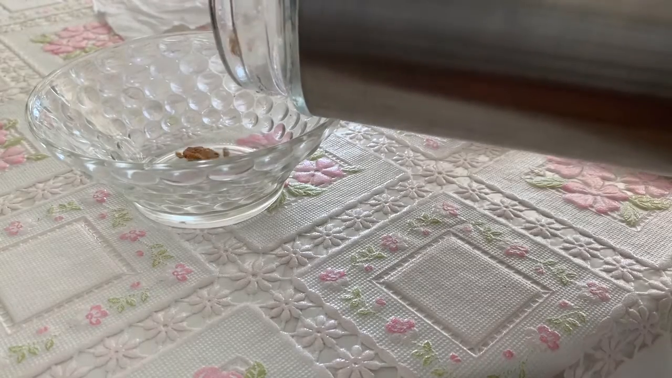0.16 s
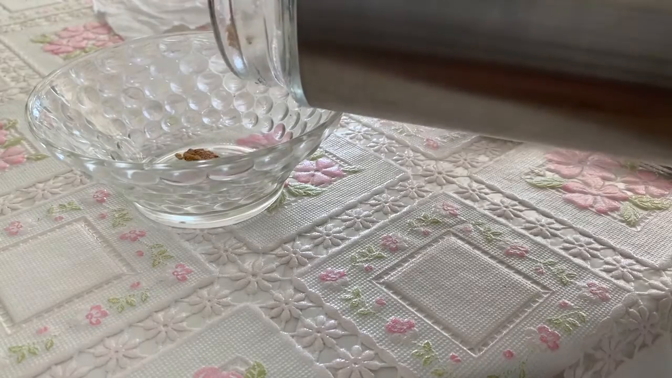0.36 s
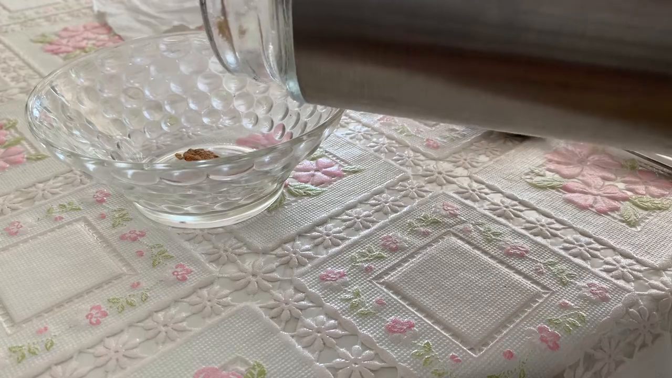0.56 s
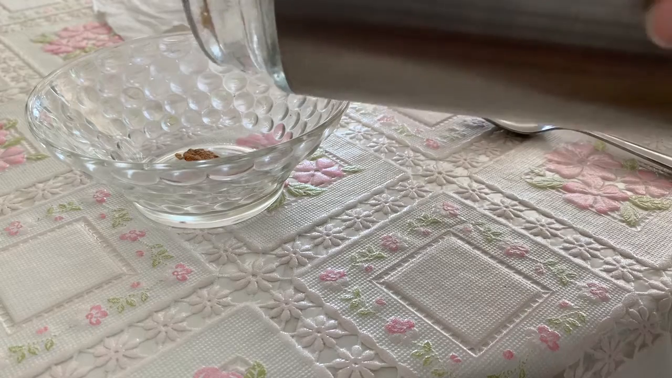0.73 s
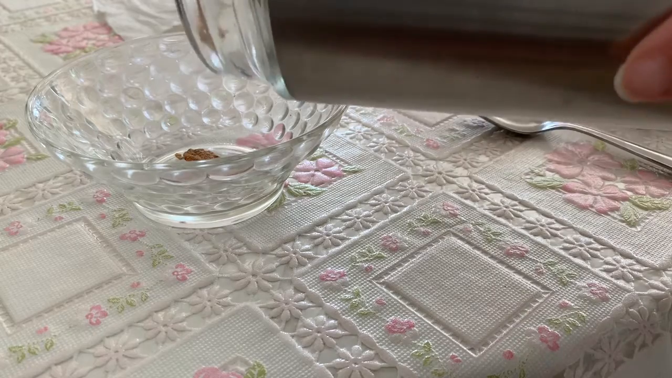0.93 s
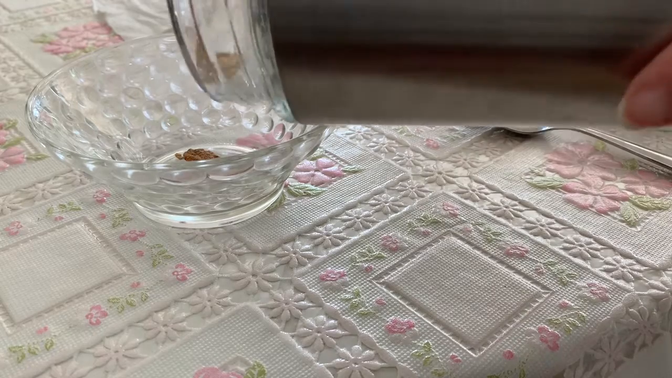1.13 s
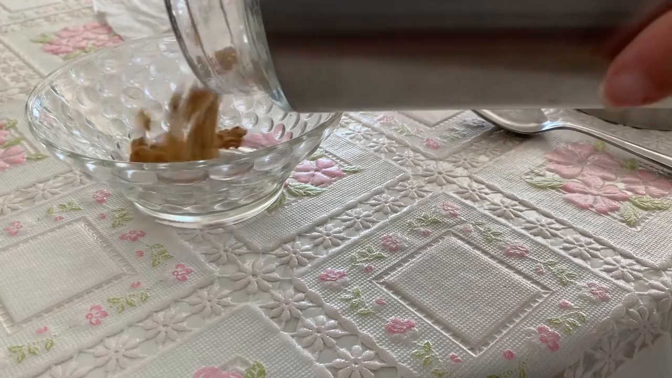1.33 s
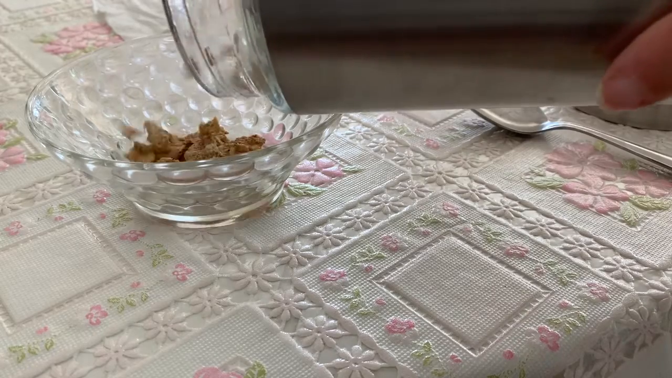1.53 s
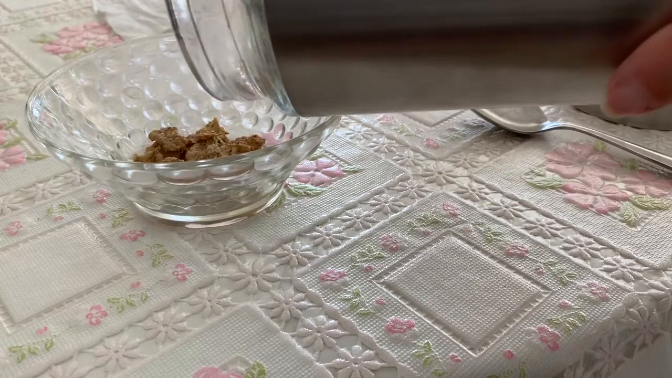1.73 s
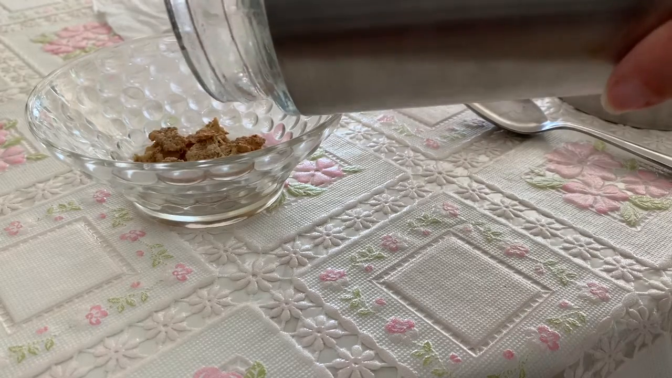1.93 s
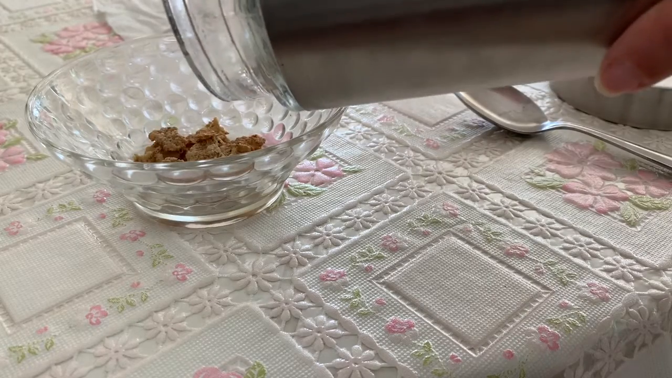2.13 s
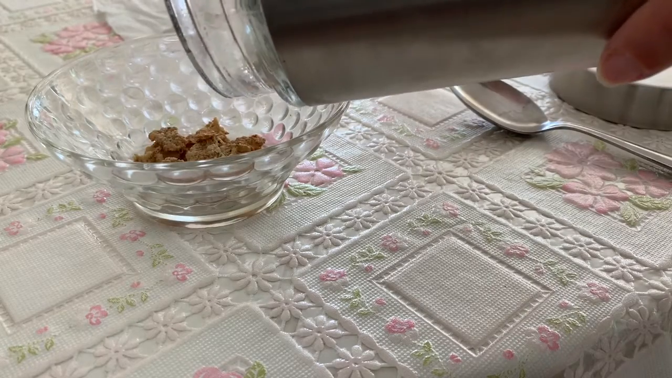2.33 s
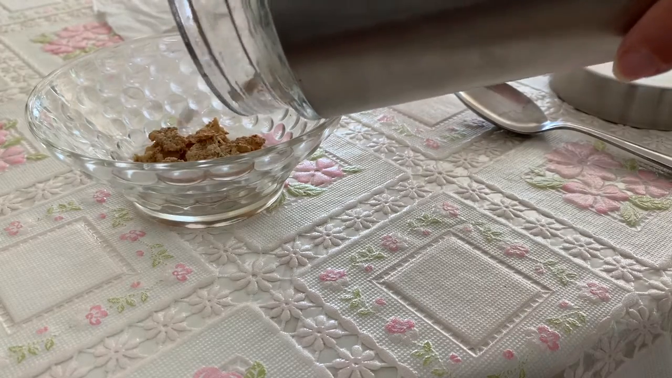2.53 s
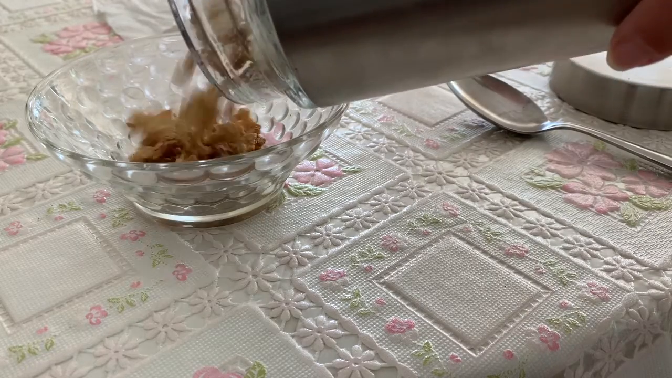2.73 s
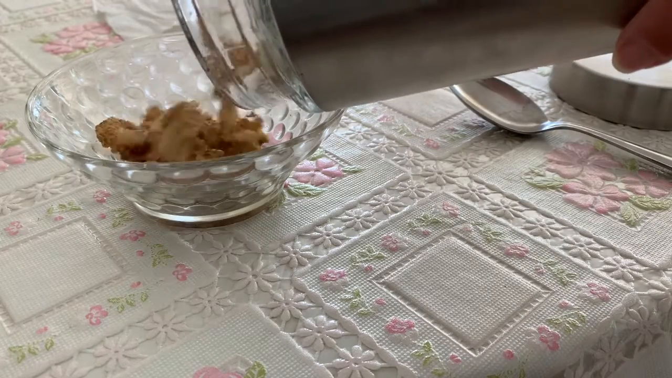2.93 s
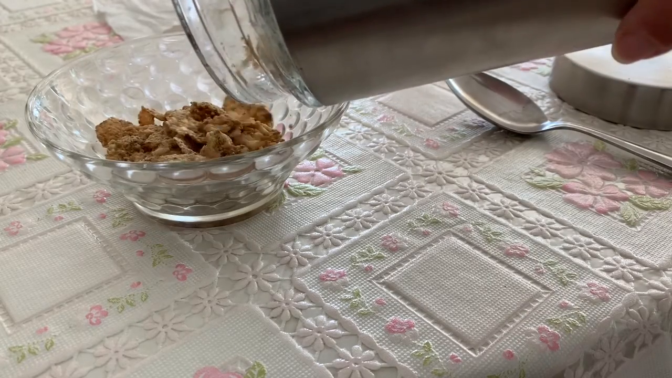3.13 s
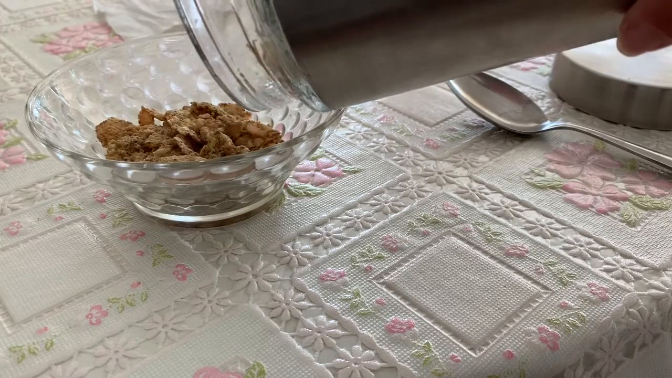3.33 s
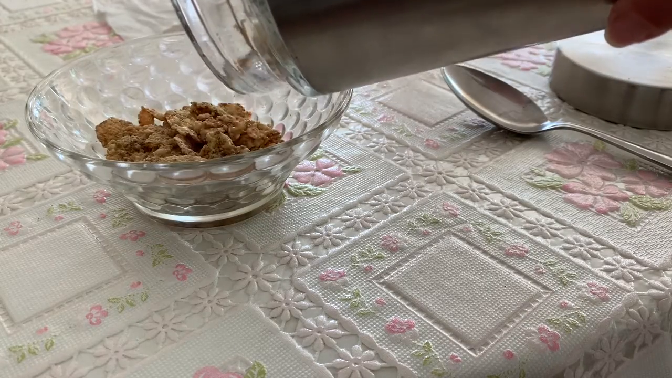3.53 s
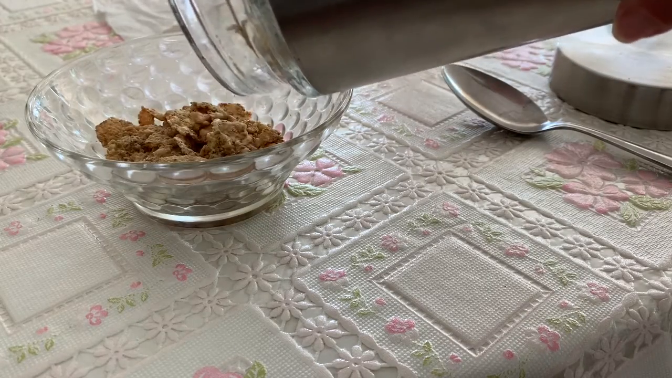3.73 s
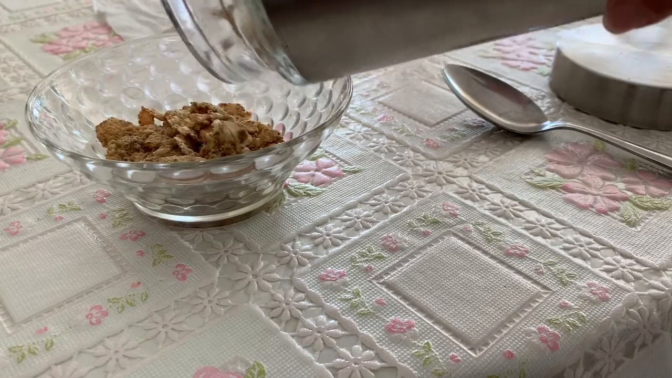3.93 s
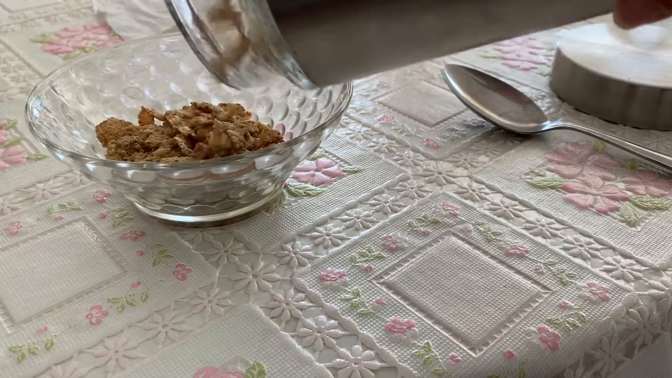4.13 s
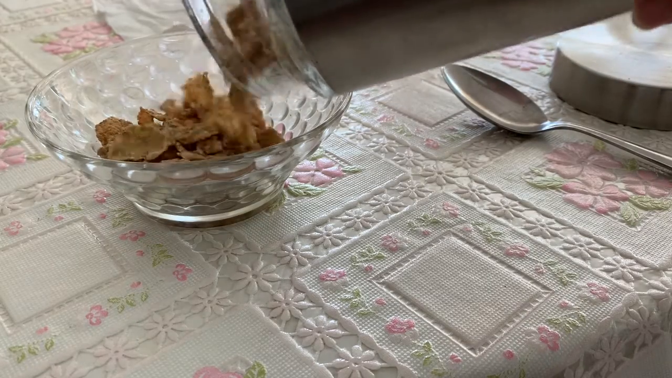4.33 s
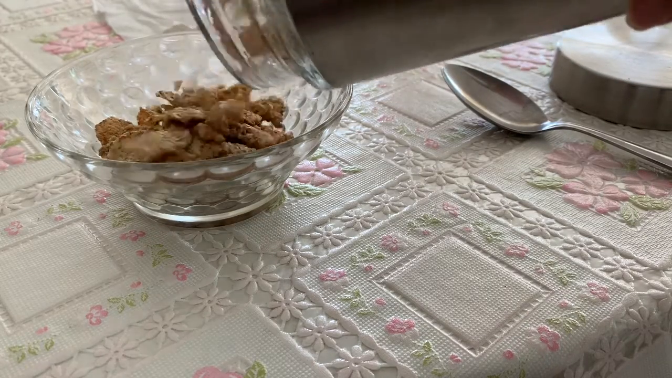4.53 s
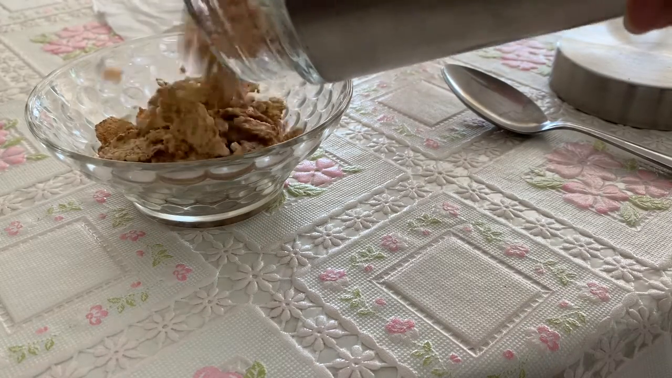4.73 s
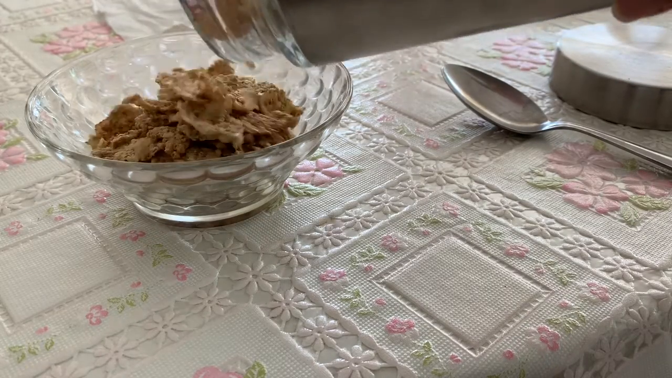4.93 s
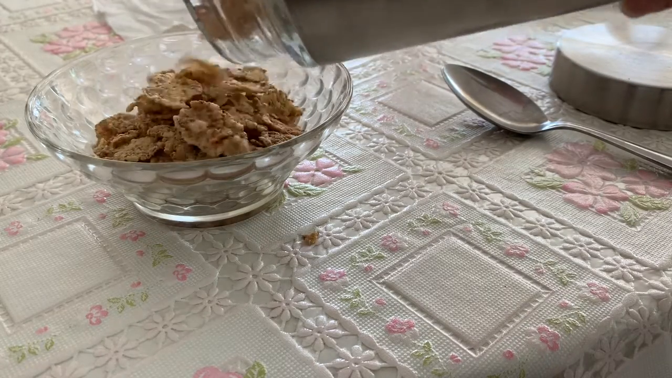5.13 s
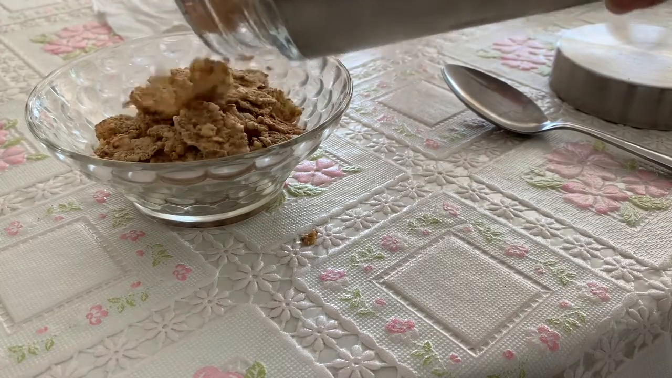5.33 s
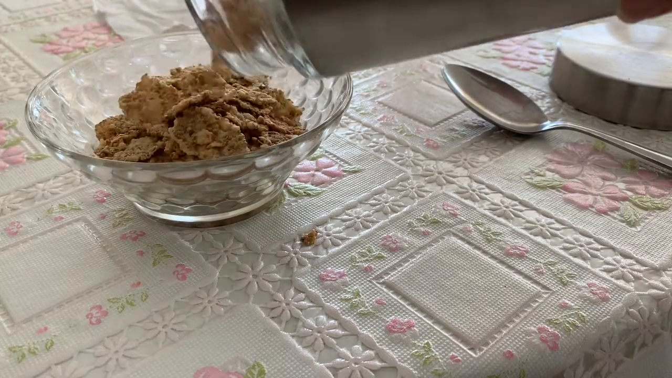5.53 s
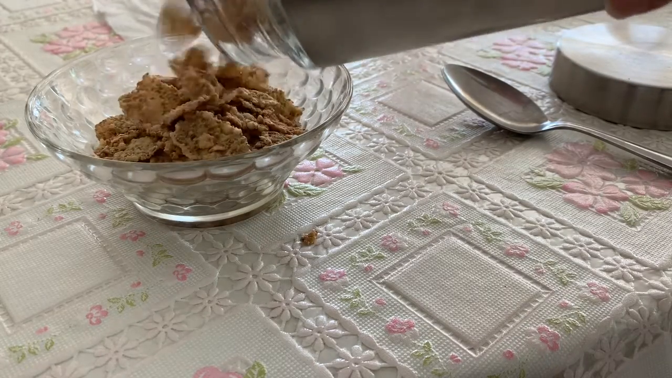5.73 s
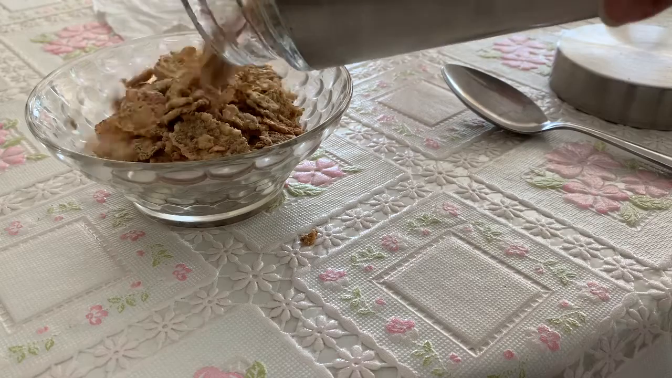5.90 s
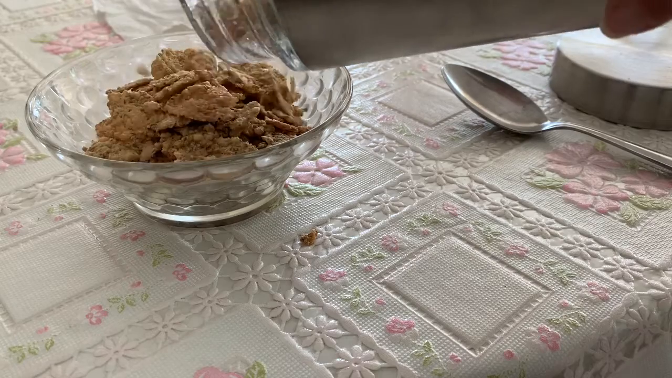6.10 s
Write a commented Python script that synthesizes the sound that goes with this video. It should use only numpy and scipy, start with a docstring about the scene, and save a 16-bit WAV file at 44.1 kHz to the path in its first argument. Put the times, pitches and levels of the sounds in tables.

```python
"""On a cloth-covered table in a small room, cereal flakes are shaken from a metal canister into a glass bowl, close by.
Flakes crackle on the heap in four rushes (resonant noise grains under clump envelopes), and large ones snap.
Strikes excite the decaying modes of the glass; the falling weight patters through the bowl as low noise thuds.
Between rushes the flakes hiss along the metal as coloured noise. One dull modal knock comes at the start.
A diffuse tail and quiet air noise lie behind."""
import sys
import numpy as np
from scipy import signal
from scipy.fft import rfft, irfft
from scipy.io import wavfile

SR = 44100
rng = np.random.default_rng(int(sys.argv[2]) if len(sys.argv) > 2 else 0)


def waveform_to_disk(signal):
    """Save audio, clipped to [-1, 1], as 16-bit WAV at the path in sys.argv[1]."""
    frames = np.transpose(np.atleast_2d(signal))
    scaled = np.clip(frames, -1, 1) * 32767
    samples = np.round(scaled).astype(np.int16)
    wavfile.write(sys.argv[1], SR, samples)


N = 271656  # samples
BODY_WEIGHT = 0.7  # share of a clump's weight that shows in the heap's body and on the glass


def amp(db):
    """Level law: decibels to an amplitude ratio."""
    return 10 ** (np.asarray(db) / 20)


def unit(x):
    """Normalization to unit root-mean-square amplitude."""
    return x / np.sqrt(np.mean(x ** 2) + 1e-20)


def read(points, hz):
    """Linear interpolation of a two-column table along a log-frequency axis."""
    table_hz, value = np.transpose(points)
    return np.interp(np.log(hz + 1), np.log(table_hz + 1), value)


def add(mix, start_s, sound):
    """Superposition: a sound is summed into the mix from its start time."""
    part = mix[:, max(round(start_s * SR), 0):][:, :sound.shape[1]]
    part += sound[:, :part.shape[1]]


# Spectrum of flakes crackling on flakes: freq_hz [Hz], gain_db [dB]
CRACKLE_SPECTRUM = [(500, -41), (2000, -26), (4000, -14), (6500, -6), (7600, -3), (8300, 2.5), (9400, -1),
                    (11000, -3), (13000, -0.5), (15500, -1), (17000, -1.5)]
# Spectrum of the hollow body of the heap: freq_hz [Hz], gain_db [dB]
HEAP_SPECTRUM = [(210, -30), (480, -11.5), (880, -13), (1380, 1.5), (1750, -5.5), (2150, -2), (2750, 6.5),
                 (3250, -2), (4100, 0), (5600, -4.5), (8100, -6.5), (14100, -7)]


def pour():
    """Collision noise: flakes land and rub, and the same collisions give a crisp top and a hollow body."""
    hits = grains(count=5000, spread_db=4.0, length_s=0.00055, focus_db=14.5)
    rubbing = rng.standard_normal((2, N))
    crisp = unit(heard(hits + amp(-9) * rubbing, CRACKLE_SPECTRUM))
    body = unit(heard(hits + amp(-6.0) * rubbing, HEAP_SPECTRUM))
    return amp(-0.5) * falling(weight_share=0) * crisp + amp(-8.5) * falling(BODY_WEIGHT) * body


# Clumps tumbling into the bowl; hold_s is how long they keep falling, weight_db how heavily they land:
# start_s [s], hold_s [s], level_db [dB, relative], weight_db [dB]
CLUMPS = [(1.255, 0.13, -34.5, -1), (1.379, 0.025, -30, -4), (1.491, 0.03, -38, -1.5),
          (1.655, 0.011, -48, 0.5), (1.779, 0.006, -60, -2), (2.688, 0.049, -28, -5),
          (2.793, 0.088, -34.5, 0.5), (2.923, 0.051, -31.5, -1.5), (3.044, 0.036, -33, -2),
          (3.24, 0.14, -54, -5.5), (3.46, 0.086, -59, -6), (3.623, 0.03, -46.5, -9),
          (4.21, 0.042, -43, 4.5), (4.267, 0.023, -34.5, 4), (4.345, 0.019, -34.5, 0.5),
          (4.423, 0.15, -36.5, 4), (4.665, 0.091, -35.5, -0.5), (4.78, 0.014, -33, 4),
          (4.835, .12, -37.5, 1.5), (5.008, 0.063, -38.5, 2.5), (5.113, 0.057, -40.5, 2),
          (5.24, 0.095, -45, -1.5), (5.361, 0.0096, -46.5, 10.5), (5.452, 0.012, -44, -4),
          (5.757, 0.097, -33.5, 1), (5.944, 0.062, -39.5, 5.5), (6.035, 0.028, -51.5, 2),
          (6.115, 0.014, -43, -3)]


def falling(weight_share):
    """Energy summation of clumps that land, keep coming and settle; deeper sounds depend more on weight."""
    power = 0
    for start_s, hold_s, level_db, weight_db in CLUMPS:
        clump = swell(start_s, hold_s, level_db, level_db, rise_db_per_s=2996, fall_db_per_s=137)
        power = power + (clump * amp(weight_share * weight_db)) ** 2
    return np.sqrt(power)


def swell(start_s, hold_s, start_db, end_db, rise_db_per_s, fall_db_per_s):
    """Exponential growth and decay (straight lines in dB), with a hold sloping between two levels."""
    t = np.arange(N) / SR - start_s
    slope_db = (end_db - start_db) * np.clip(t / hold_s, 0, 1)
    rise_db = rise_db_per_s * np.minimum(t, 0)
    fall_db = fall_db_per_s * np.maximum(t - hold_s, 0)
    return amp(start_db + slope_db + rise_db - fall_db)


def grains(count, spread_db, length_s, focus_db):
    """Granular texture: flakes of many sizes touch at random moments, many lightly and a few hard."""
    kinds = [flake(hz, length_s * rng.uniform(.5, 1.5), focus_db, width_octaves=.035,
                   chatter_db=-20, chatter_s=.003, size=512)
             for hz in np.geomspace(3200, 15000, num=96)]
    out = np.zeros((2, N + 512))
    starts, picks = rng.integers(0, N, count), rng.integers(0, len(kinds), count)
    forces = amp(spread_db * np.minimum(rng.exponential(1, count), 4))
    for start, pick, force in zip(starts, picks, forces):
        out[:, start:start + kinds[pick].shape[1]] += force * kinds[pick]
    return unit(out[:, :N])


def flake(hz, length_s, focus_db, width_octaves, chatter_db, chatter_s, size=1024, rise=0.35):
    """Resonant noise burst: it swells briefly to a crack and chatters away, coloured by the flake's resonance."""
    t = (np.arange(size) - size // 8) / SR
    away = np.where(t > 0, t, -t / rise)  # the swell takes a share `rise` of the time of the decay
    crack = np.exp(-away / max(length_s, 1 / SR))
    chatter = amp(chatter_db) * np.exp(-away / chatter_s)
    octaves = np.log2((np.fft.rfftfreq(size, 1 / SR) + 1) / hz)
    resonance = 1 + amp(focus_db) / (1 + 1j * octaves / width_octaves)
    noise = (crack + chatter) * rng.standard_normal((2, size))
    return unit(irfft(rfft(noise) * resonance))


# Large flakes snapping and landing; the crack peaks two contact lengths after its start:
# start_s [s], level_db [dB, relative], resonance_hz [Hz], contact_s [s]
SNAPS = [(0.0267, -26.5, 6520, 0.0006), (0.0443, -27.5, 6610, 0.00056), (0.092, -30, 6500, 0.00068),
         (0.1123, -22, 8160, 0.00055), (0.146, -21.5, 11100, 0.0006), (0.176, -25, 11600, 0.0006),
         (0.1934, -32, 12300, 0.0006), (0.2198, -37, 10300, 0.00066), (0.399, -40.5, 9360, 0.0006),
         (1.2271, -15, 11900, 0.00063), (1.2785, -22, 8500, 0.00056), (1.313, -16.5, 8300, 0.00062),
         (1.3906, -11.5, 11600, 0.00046), (1.5174, -17, 8430, 0.0006), (1.6559, -23.5, 8650, 0.00058),
         (2.4941, -21.5, 13500, 0.00072), (2.6042, -25, 8700, 0.00057), (2.6859, -17.5, 8510, 0.00058),
         (2.6936, -15, 7880, 0.0006), (2.7194, -20, 8310, 0.00053), (2.8105, -14.5, 9300, 0.00052),
         (3.056, -14, 8300, 0.00057), (3.1152, -16.5, 8200, 0.0006), (3.276, -30, 8450, 0.0006),
         (3.318, -32, 14600, 0.00066), (3.6334, -28, 14200, 0.0006), (3.6861, -24.5, 14300, 0.0006),
         (3.941, -18, 13200, 0.00055), (4.0976, -24.5, 8280, 0.00058), (4.1492, -19.5, 8300, 0.00056),
         (4.2103, -20, 7900, 0.00056), (4.2658, -13.5, 8000, 0.00057), (4.349, -15, 8400, 0.00044),
         (4.5062, -16, 7400, 0.00062), (4.578, -17.5, 12600, 0.00042), (4.6664, -23, 10600, 0.0006),
         (4.6863, -14, 8400, 0.0006), (4.7935, -17, 8900, 0.00073), (4.842, -20, 10800, 0.00056),
         (4.958, -21, 8400, 0.00089), (5.0587, -13.5, 8400, 0.00057), (5.1133, -15.5, 9800, 0.00053),
         (5.1791, -27, 9460, 0.00064), (5.2869, -27, 7950, 0.00067), (5.37, -20, 8400, 0.0006),
         (5.455, -22, 8350, 0.0006), (5.5758, -22, 13400, 0.00076), (5.7394, -17, 14600, 0.00055),
         (5.7593, -10, 9000, 0.00053), (5.9447, -15.5, 7170, 0.00068), (5.994, -28, 9040, 0.0006),
         (6.0535, -19, 14600, 0.0008), (6.0624, -20.5, 8300, 0.00069)]
# Spectrum of the snaps: freq_hz [Hz], gain_db [dB]
SNAP_SPECTRUM = [(210, -20), (950, -22), (2050, -18.5), (2850, -7), (3600, -16.5), (5400, -8), (8400, -0.5),
                 (9600, -1.5), (13900, -3), (16400, 3)]


def snaps(focus_db=6, size=1024):
    """Transient impact of the large flakes: at a given level, a longer contact carries more energy."""
    out = np.zeros((2, N))
    for start_s, level_db, hz, contact_s in SNAPS:
        crack = flake(hz, contact_s, focus_db, width_octaves=0.059, chatter_db=-10, chatter_s=0.0047,
                      size=size, rise=0.36)
        strength = amp(level_db) * np.sqrt(contact_s * SR)
        peak_offset_s = size // 8 / SR
        add(out, start_s + 2 * contact_s - peak_offset_s, strength * crack / np.linalg.norm(crack))
    return amp(2.0) * heard(out, SNAP_SPECTRUM)


# Flakes striking bare glass; the modes near centre_hz are excited most:
# start_s [s], level_db [dB, relative], centre_hz [Hz], reach_octaves [octaves]
CLINKS = [(0.0082, -46, 11800, 0.54), (0.1475, -45, 11600, .26), (1.2276, -34, 11600, .44),
          (1.3123, -44.5, 2600, 1.5), (1.532, -47, 3530, .7), (1.6562, -48.5, 2600, 1.9),
          (2.795, -42.5, 1320, 1.3), (2.8597, -39.5, 1810, 1.3), (2.9345, -42, 2570, 0.95),
          (3.1486, -50.5, 1670, 0.98), (4.4254, -47, 1780, 0.95), (4.5532, -43, 4600, 0.55),
          (4.582, -44.5, 2870, .6), (4.8352, -41.5, 4230, 0.88), (4.9207, -46.5, 1500, 0.69),
          (5.1132, -47.5, 2620, 1.6), (5.241, -45.5, 4750, 0.31), (5.5092, -53.5, 5500, 1.5),
          (5.945, -36.5, 4800, 0.66), (5.9941, -53, 1310, 0.46), (6.118, -47, 8000, 1)]
# Modes of the glass bowl; left leads right by lead_rad:
# mode_hz [Hz], level_db [dB, relative], t60_s [s], lead_rad [rad]
BOWL_MODES = [(1312, 2.3, .26, .8), (2871, 6, .38, 1.9), (4388, -13, .3, -1.1), (4786, 2, .21, .6),
              (7166, -6, .1, 1.1), (10165, -2, .27, -1.2), (10769, -4, .2, -.5), (11912, -2, .16, -.5),
              (12911, -5, .15, -.8), (14384, -7, .15, -.9), (15165, -7, .2, -1.1)]


def bowl(strikes_per_s=320, rain_db=-26.0, heap_db_per_s=-0.94):
    """Modal resonance: strikes ring the glass in varied mixes; the growing heap shields it from the rain."""
    out = np.zeros((2, N))
    strikes = unit(contacts(strikes_per_s, spread_db=-1))
    at = np.flatnonzero(strikes)
    shielding = amp(rain_db + heap_db_per_s * (at - N / 2) / SR)
    force = strikes[at] * falling(BODY_WEIGHT)[at] * shielding
    for mode_hz, level_db, t60_s, lead_rad in BOWL_MODES:
        pole = amp(-60 / t60_s / SR) * np.exp(2j * np.pi * mode_hz / SR)
        place = np.sqrt(3) * rng.uniform(-0.92, 1, N)[at]  # how each landing place drives this mode
        drive = np.zeros(N)
        drive[at] = force * place * np.sqrt(2 * (1 - abs(pole) ** 2))  # evens out long and short rings
        for start_s, clink_db, centre_hz, reach_octaves in CLINKS:
            closeness = np.exp(-(np.log2(mode_hz / centre_hz) / reach_octaves) ** 2)
            drive[round(start_s * SR)] += amp(clink_db) * closeness
        ring = amp(level_db) * signal.lfilter([1], [1, -pole], drive + 1e-15)
        out += [ring.imag, (ring * np.exp(-1j * lead_rad)).imag]
    return out


def contacts(per_s, spread_db):
    """Random impulse process: independent moments, with levels spread exponentially in dB."""
    return (rng.random(N) < per_s / SR) * amp(spread_db * np.minimum(rng.exponential(1, N), 3.5))


# Spectrum of the patter through the table top: freq_hz [Hz], gain_db [dB]
PATTER_SPECTRUM = [(30, -20), (60, -10.5), (95, -4.5), (125, -5.5), (160, 1), (250, -3.5), (340, -9),
                   (450, -32), (900, -24.5), (3000, -67)]


def patter(thuds_per_s=300, decay_s=0.0048, filling_db_per_s=1.0):
    """Structure-borne impact noise: falling weight drums through the bowl, more as the bowl fills."""
    impacts = contacts(thuds_per_s, spread_db=1.0)
    thuds = signal.lfilter([1], [1, -np.exp(-1 / (decay_s * SR))], impacts)
    filling = amp(-20.0 + filling_db_per_s * (np.arange(N) - N / 2) / SR)
    drumming = unit(heard(thuds * rng.standard_normal((2, N)), PATTER_SPECTRUM))
    return filling * falling(weight_share=0.9) * drumming


# Spectrum of the hiss along the metal: freq_hz [Hz], gain_db [dB]
SLIDE_SPECTRUM = [(500, -32), (2500, -25), (4500, -6), (6500, -6), (8700, -0.5), (12000, -4.5),
                  (16000, -6.5)]
# Spectrum of the hollow sound of the can: freq_hz [Hz], gain_db [dB]
CAN_SPECTRUM = [(100, 4.5), (300, -4.5), (500, 0.5), (800, -5), (1300, -1), (1700, -2.5), (2700, 2.5),
                (4000, -0.5), (5500, -10), (10000, -6)]


def slide():
    """Friction noise: scrapes along the metal merge into a hiss; now and then flakes tick together."""
    ticks = grains(count=2500, spread_db=4.0, length_s=0.0007, focus_db=11.5)
    scrapes = rng.standard_normal((2, N)) + amp(-1.0) * ticks
    hiss = amp(-0.56) * sliding(hollow=False) * unit(heard(scrapes, SLIDE_SPECTRUM))
    hollow = amp(4.0) * sliding(hollow=True) * unit(heard(scrapes, CAN_SPECTRUM))
    return hiss + hollow


# Flakes sliding, gathering or losing speed; can_db sets the hollow sound against the hiss, before mixing:
# start_s [s], length_s [s], start_db [dB, relative], end_db [dB, relative], can_db [dB]
SLIDES = [(0.0, 0.08, -59.5, -53, -5), (0.157, 0.32, -53, -67.5, -23.5), (0.46, 0.3, -67.5, -69, -4.5),
          (0.783, 0.26, -63.5, -55.5, -10), (1.106, 0.13, -50.5, -47, -10.5),
          (2.108, 0.37, -58, -54.5, -10.5), (2.498, 0.21, -51, -43, -11.5), (3.818, 0.16, -55, -66, -15),
          (4.032, 0.16, -51, -53.5, -8.5), (5.612, 0.13, -57.5, -50, -6)]


def sliding(hollow):
    """Energy summation of all the slides over time, as hiss or as the hollow sound of the can."""
    power = 0
    for start_s, length_s, start_db, end_db, can_db in SLIDES:
        gain = swell(start_s, length_s, start_db, end_db, rise_db_per_s=330, fall_db_per_s=300)
        power = power + (gain * amp(can_db * hollow)) ** 2
    return np.sqrt(power)


# Modes of the knock through the table: mode_hz [Hz], level_db [dB, relative], t60_s [s]
KNOCK_MODES = [(90.5, -38.5, 0.18), (138.5, -39, 0.17), (168.4, -30, 0.08), (233, -31, 0.066),
               (305, -41, 0.1), (626, -40.5, 0.031), (1343, -29.5, 0.028), (1430, -19.5, 0.0042),
               (2330, -30.5, 0.01)]


def knock(start_s=0.0555, rise_s=0.002):
    """Damped modal vibration: a dull bump, damped by the cloth."""
    t, out = np.arange(SR // 2) / SR, np.zeros((2, N))
    thump = sum(amp(level_db - 60 * t / t60_s) * np.sin(2 * np.pi * mode_hz * t)
                for mode_hz, level_db, t60_s in KNOCK_MODES)
    balance = amp([[.5], [-.5]])  # slightly stronger on the left
    add(out, start_s, thump * (1 - np.exp(-t / rise_s)) * balance)
    return out


# The microphone pair; likeness runs 0-1, left leads by lead_rad and exceeds right by balance_db:
# freq_hz [Hz], likeness [ratio], lead_rad [rad], balance_db [dB]
MICS = [(166, 0.96, -0.25, 1.2), (678, 0.75, -0.13, -1), (2560, 0.37, -0.6, -1), (4000, 0.53, -0.1, 0.5),
        (5120, 0.65, -3.5, 4.5), (6750, 0.02, -5.5, 1.5), (8400, 0.75, -6.5, 3), (11900, .9, -5.4, 1.2),
        (15900, .9, -8.6, -1.3)]


def heard(pair, spectrum):
    """Interchannel coherence: two unrelated signals are coloured and blended as two microphones hear them."""
    hz, mics = np.fft.rfftfreq(4096, 1 / SR), np.array(MICS)
    likeness, lead_rad, balance_db = (read(mics[:, [0, k]], hz) for k in range(1, 4))
    likeness = np.clip(likeness, 0, 1)
    gain_db = read(spectrum, hz)
    left = amp(gain_db + balance_db / 2)
    right = amp(gain_db - balance_db / 2) * np.exp(-1j * lead_rad)
    responses = np.array([left, right * likeness, right * np.sqrt(1 - likeness ** 2)])
    taps = np.fft.fftshift(irfft(responses), axes=1)
    filtered = signal.oaconvolve(pair[[0, 0, 1]], taps, axes=1)
    left_out, shared, own = filtered[:, taps.shape[1] // 2:][:, :pair.shape[1]]
    return np.array([left_out, shared + own])


# Decay of the room: freq_hz [Hz], t60_s [s]
ROOM_DECAY = [(100, 0.21), (500, 0.44), (3000, 0.33), (9000, 0.24), (16000, 0.21)]


def room(x, onset_s=0.00097, shared_hz=400):
    """Diffuse reverberation: each band dies at its own speed; long waves reach both microphones alike."""
    hz, t, bands = signal.stft(rng.standard_normal((2, SR // 2)), SR, nperseg=256)
    bands = np.where(hz[:, None] < shared_hz, bands[0], bands)
    decay = amp(-60 * t / read(ROOM_DECAY, hz)[:, None])
    tail = signal.istft(bands * decay, SR, nperseg=256)[1]
    tail *= 1 - np.exp(-(np.arange(tail.shape[1]) / SR / onset_s) ** 2)
    return signal.fftconvolve(x, tail / np.linalg.norm(tail[0]), axes=1)[:, :N]


# Spectrum of the quiet background: freq_hz [Hz], gain_db [dB]
QUIET_SPECTRUM = [(20, -10), (40, -0.5), (80, -9.5), (160, -13.5), (300, -12.5), (500, -21.5), (1000, -25),
                  (2500, -31.5), (16000, -35)]


def air():
    """Stationary background noise: steady, quiet and weighted to the low frequencies."""
    return amp(-71.5) * unit(heard(rng.standard_normal((2, N)), QUIET_SPECTRUM))


def scene():
    """Superposition of the direct sources, their reverberation and the background."""
    near = slide() + pour() + snaps() + bowl() + patter() + knock()
    background = air()
    return near + amp(-8.0) * room(near) + background


def record(dry, rumble_hz=36, edge_hz=15950):
    """Band limiting: a high-pass removes rumble and a low-pass ends the treble."""
    highpass = signal.butter(3, rumble_hz, "high", fs=SR, output="sos")
    lowpass = signal.firwin(511, edge_hz, window=("kaiser", 8), fs=SR)
    return signal.oaconvolve(signal.sosfilt(highpass, dry), lowpass[None], "same")


dry = scene()
out = record(dry)
waveform_to_disk(out)
```